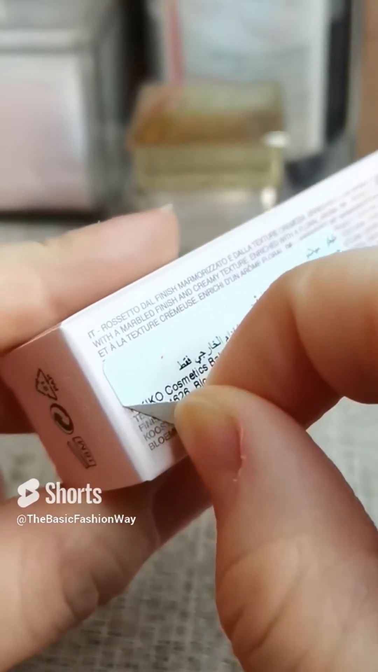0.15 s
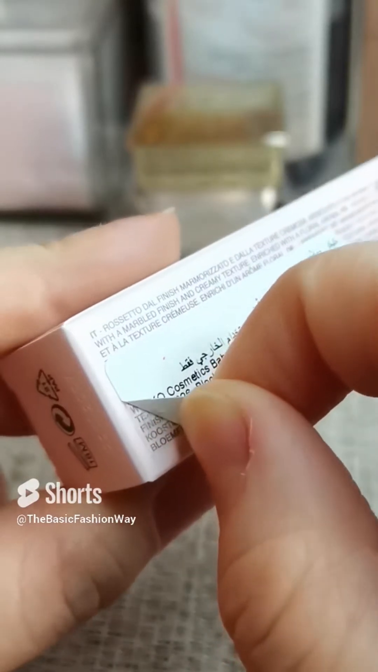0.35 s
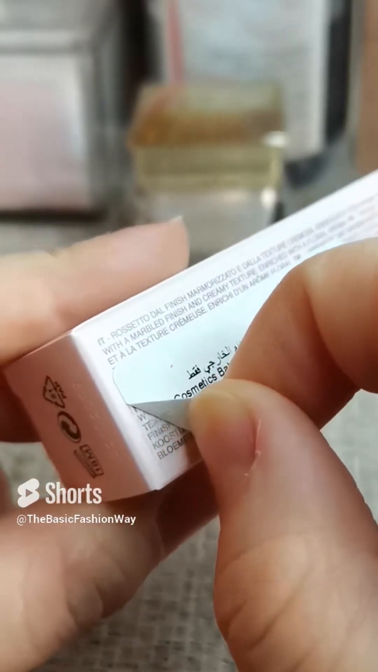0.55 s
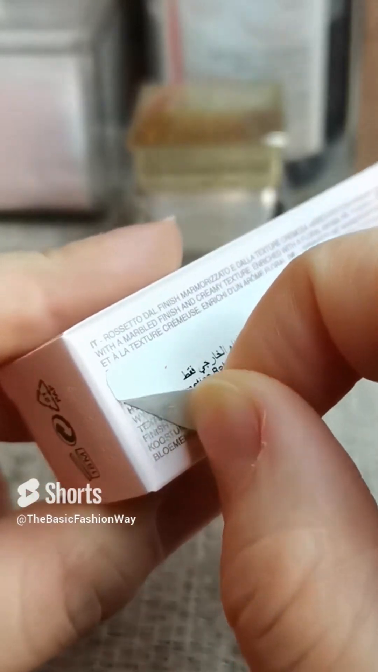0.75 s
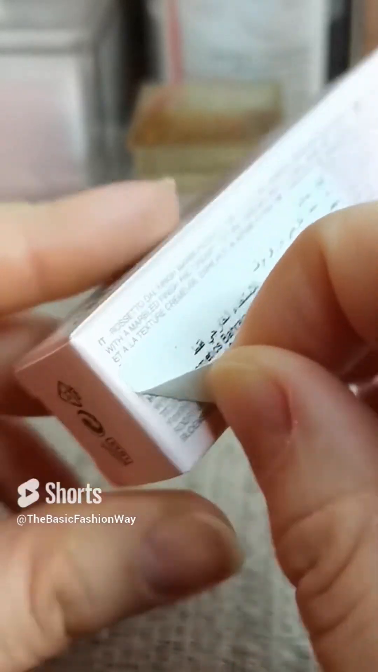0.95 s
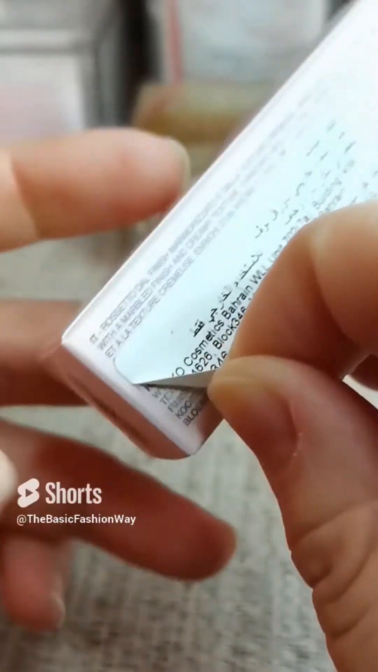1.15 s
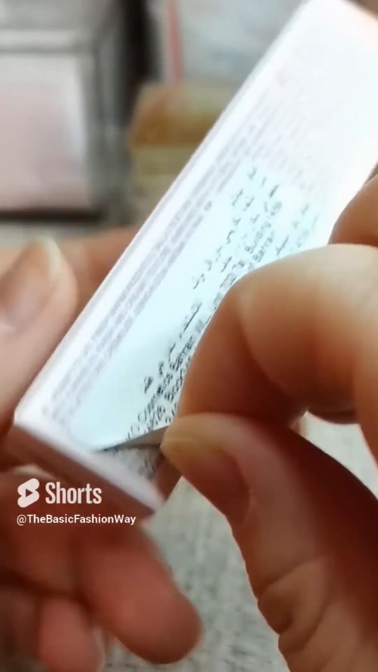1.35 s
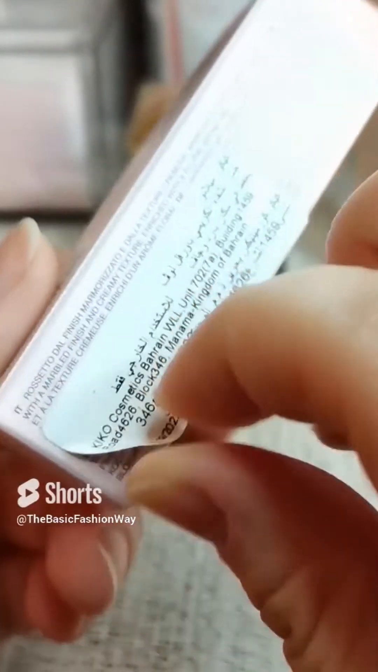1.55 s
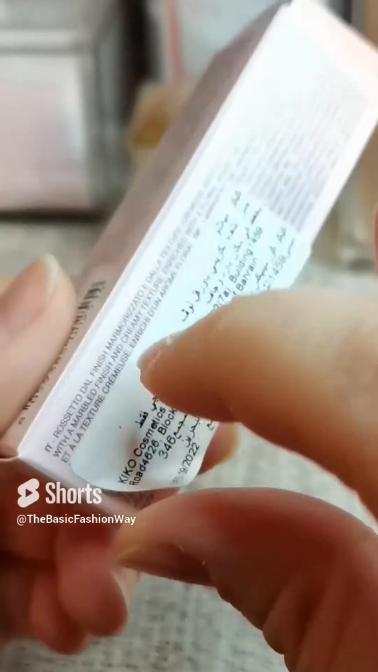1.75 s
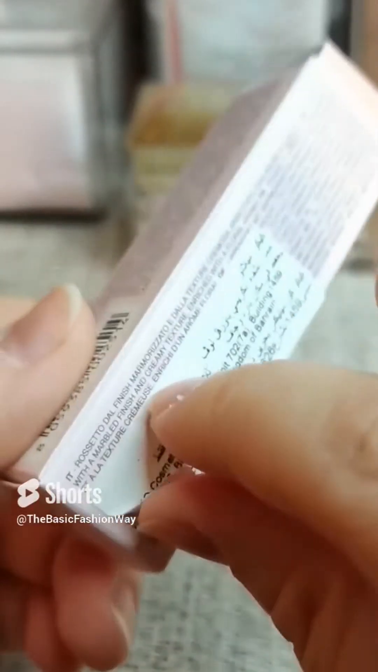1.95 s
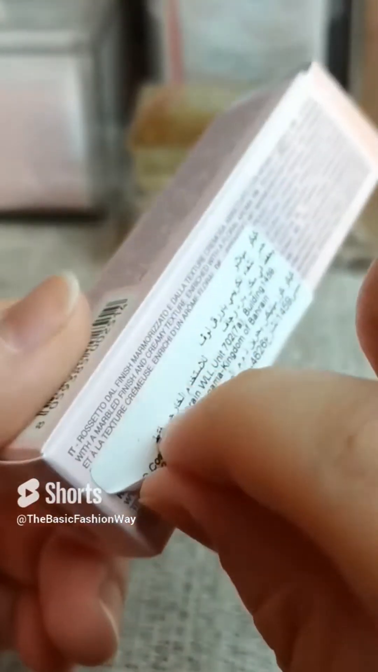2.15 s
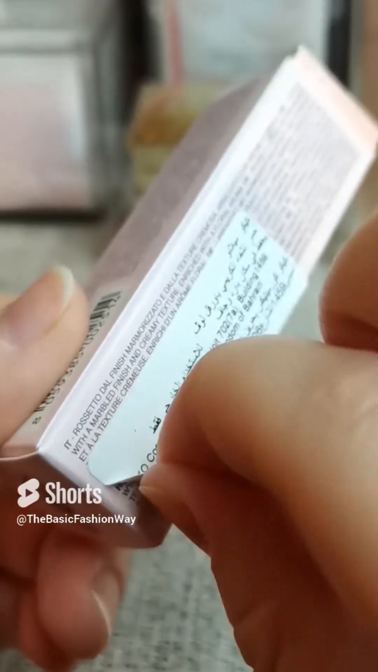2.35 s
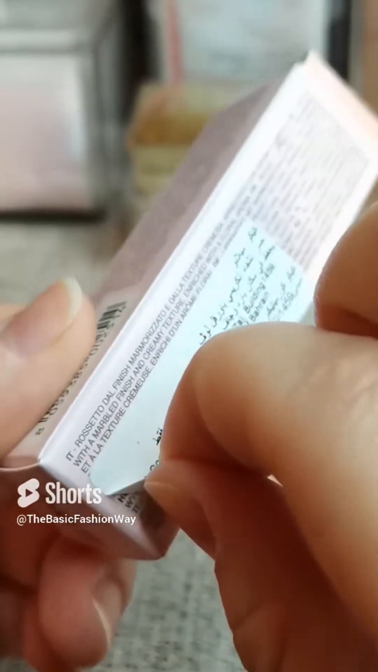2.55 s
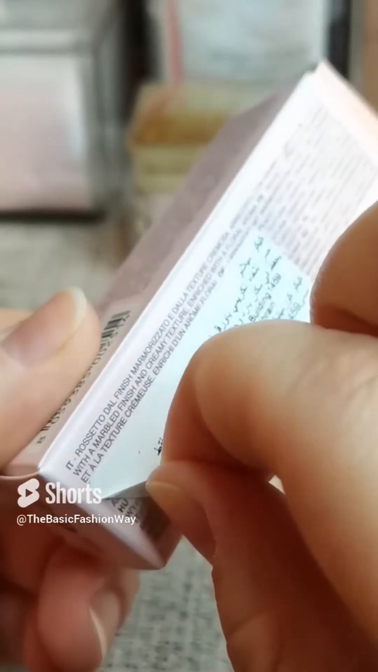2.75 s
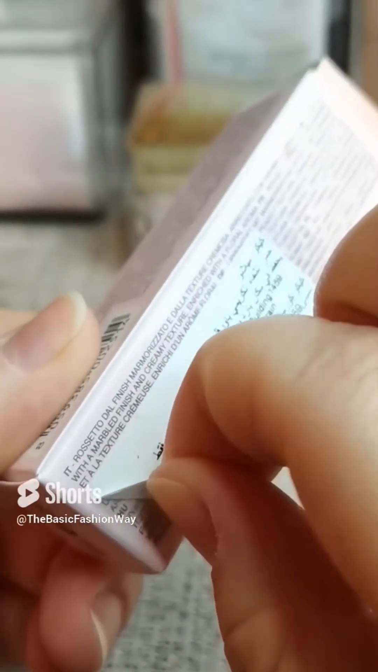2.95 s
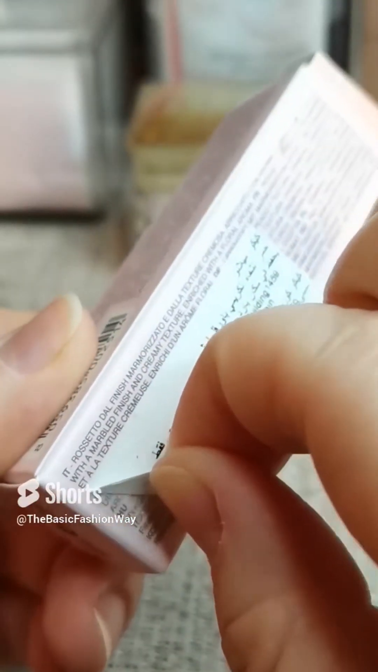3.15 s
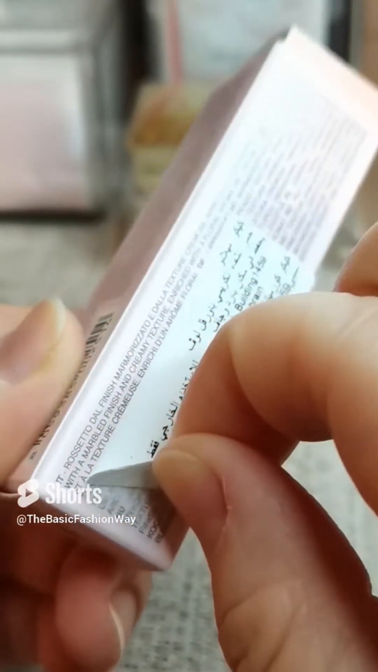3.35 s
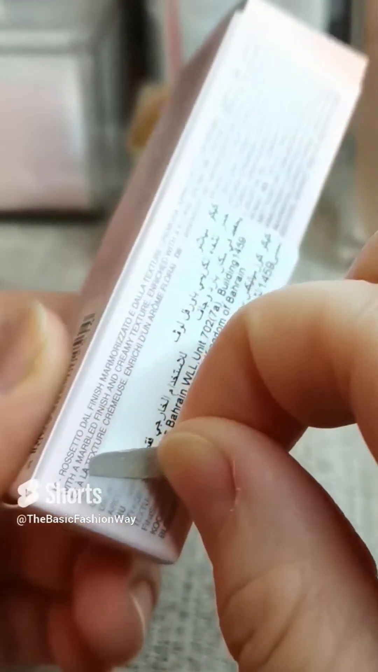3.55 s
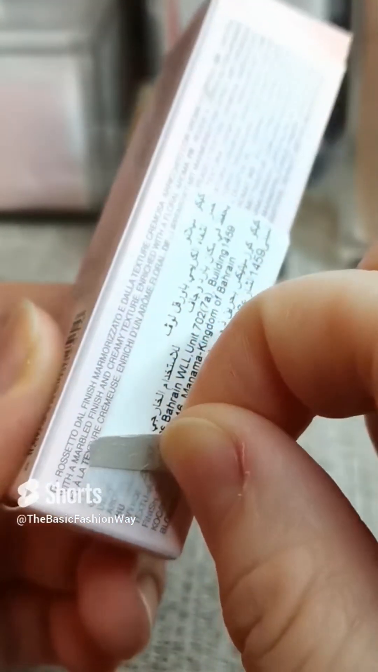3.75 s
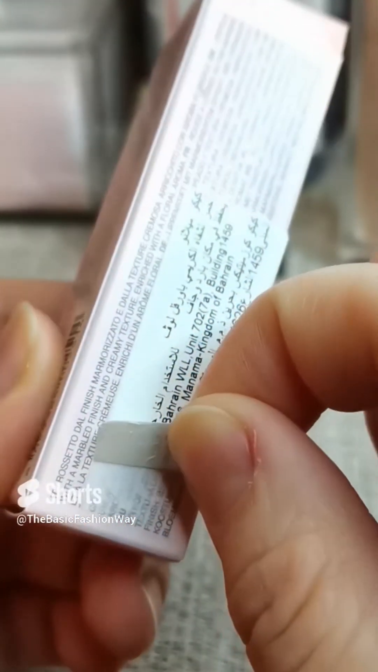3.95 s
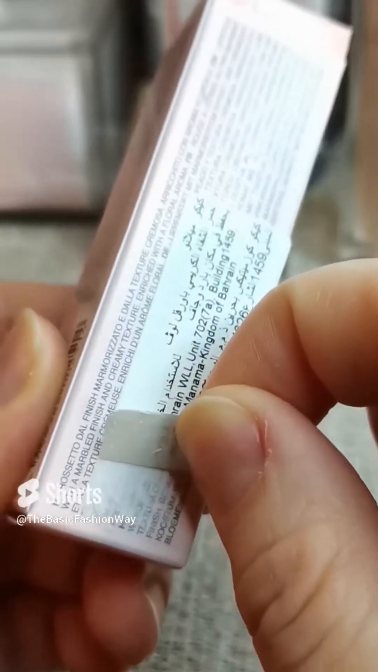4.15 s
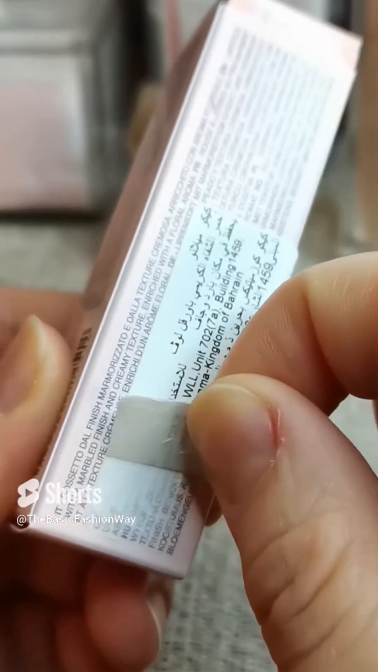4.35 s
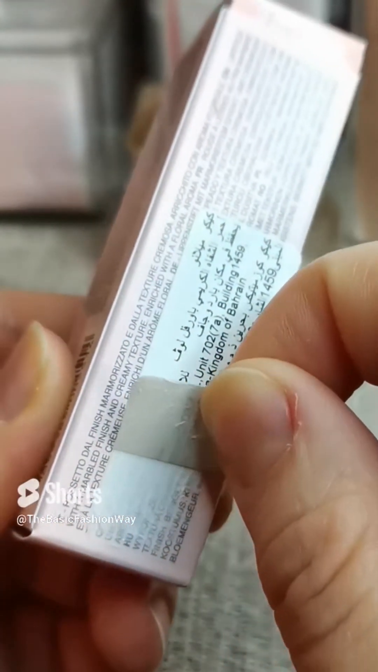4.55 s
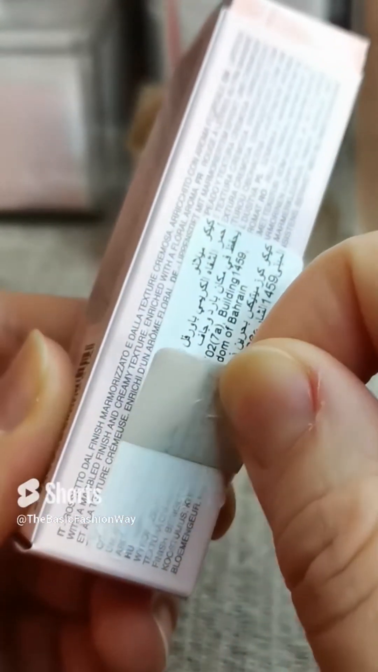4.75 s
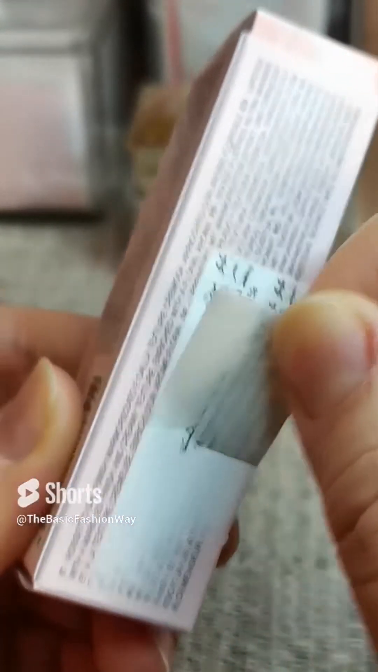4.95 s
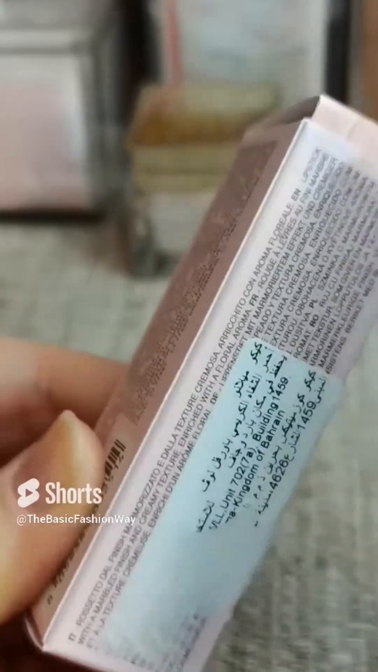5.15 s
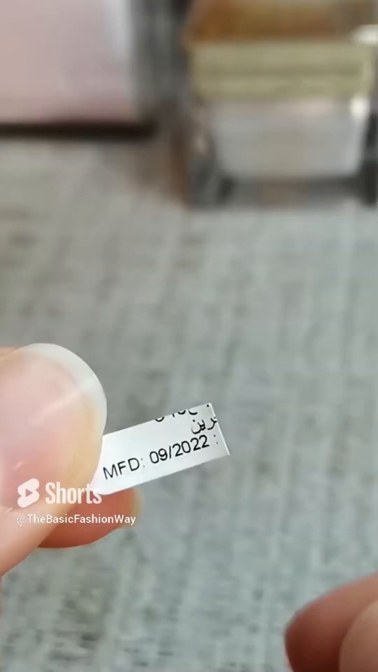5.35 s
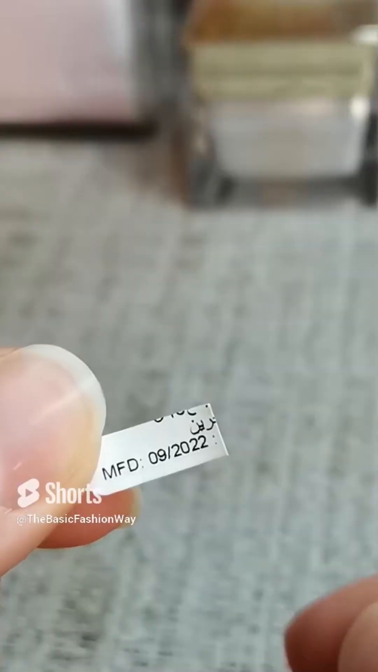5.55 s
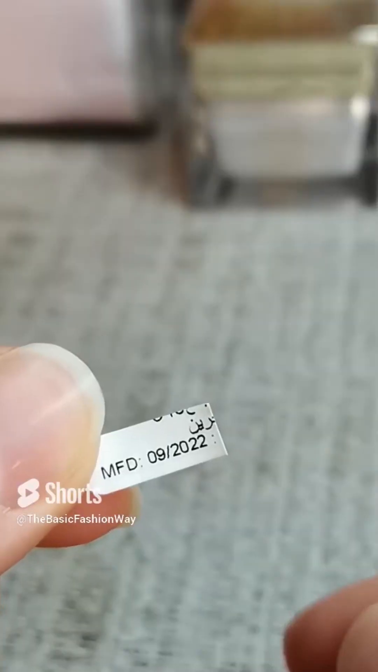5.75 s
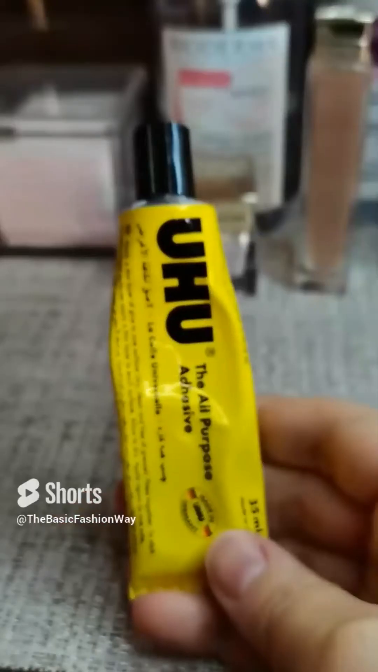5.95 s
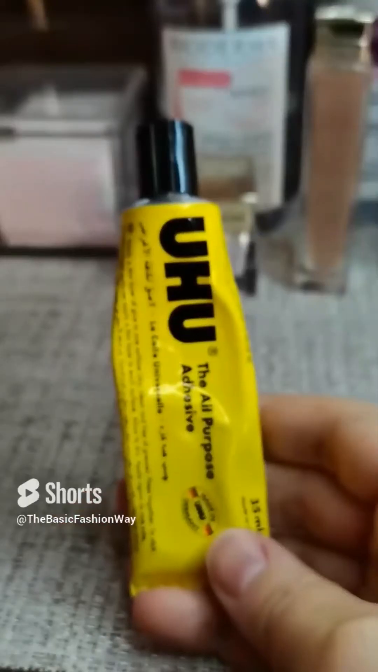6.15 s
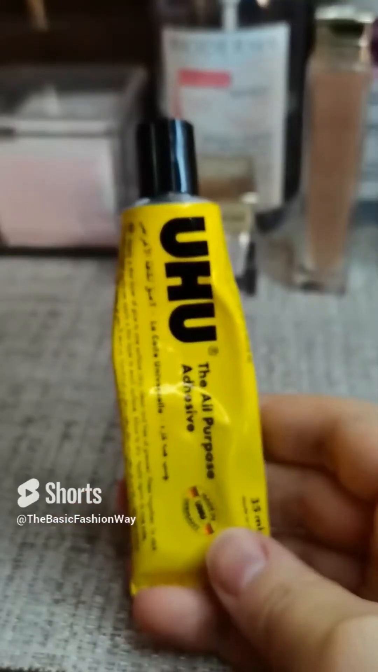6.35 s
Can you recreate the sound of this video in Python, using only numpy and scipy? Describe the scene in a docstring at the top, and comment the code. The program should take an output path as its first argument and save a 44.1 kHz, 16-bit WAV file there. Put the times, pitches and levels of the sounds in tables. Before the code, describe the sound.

Close, quiet picking at a sticker on a little carton: dry scratches, two snaps, sticky crackles, a quick loud tear, then faint room hum.

```python
"""A quiet room, close to a phone: a fingernail picks at a paper label on a small cardboard box and peels it off.
Short scratches lift the corner; in a row of tugs the glue lets go in tiny stick-slip impulses that fizz, rustle
the paper and ring the modes of the hollow box, ending in one fast rip. Glue threads tick, larger patches knock
the box, the taut corner sings thinly through a narrow resonance, and the nail snaps off the edge twice.
Under it lie a faint mains hum of two wavering sines and shaped noise for rumble and hiss."""
import sys
import numpy as np
from scipy import signal
from scipy.fft import rfft, irfft
from scipy.io import wavfile
from scipy.ndimage import uniform_filter1d

SR = 44100
rng = np.random.default_rng(int(sys.argv[2]) if len(sys.argv) > 2 else 0)


def file_out(sig):
    """Save sig as 16-bit WAV at sys.argv[1]."""
    # one column per channel
    cols = np.atleast_2d(sig).T
    # limit, then scale
    lim = np.clip(cols, -1, 1)
    pcm = np.round(lim * 32767).astype(np.int16)
    wavfile.write(sys.argv[1], SR, pcm)


N = 281827
TIME = np.arange(N) / SR
LEAD_IN = 44  # samples before a response's main arrival
TUG_ATTACK_S, TUG_RELEASE_S = 0.01, 0.022

# rustle spectrum of the peeling label: freq_hz, relative_db
PAPER_SPECTRUM = [(500, -34), (1300, -11.5), (1750, -8.5), (1960, 0.5), (2230, -5.5), (2480, -3.5),
                  (2740, -1), (3000, -14), (3500, -10), (4000, -15.5), (4550, -21), (5100, -28.5),
                  (12000, -49)]
# fizz spectrum of parting glue: freq_hz, relative_db
FIZZ_SPECTRUM = [(1000, -9.5), (3000, -7.5), (4500, -0.5), (5200, -7.5), (6500, -3.5), (7600, 5),
                 (8400, -6), (9300, -3.5), (11000, -10.5), (16000, -14.5)]
# modes of the hollow box: freq_hz, width_hz, relative_db
CAVITY_MODES = [(557, 173, -10), (629, 148, 2.5), (770, 210, 0.5), (965, 78.4, 0), (1089, 67, 1.5),
                (1214, 61, 0)]
# modes of the wall under the label: freq_hz, width_hz, relative_db
WALL_MODES = [(1487, 73, -2), (1603, 104, -3.5), (1882, 78, -14)]
# the last rip runs away: time_s, speed (0-1)
RIP_SPEED = [(4.68, 0), (4.775, 0.33), (4.85, 0.37), (4.925, 0.45), (4.98, 0.79), (5.012, 0.85),
             (5.06, 0.68)]


def undb(db):
    """Decibels to amplitude gain."""
    return 10 ** (np.asarray(db) / 20)


def unit(x):
    """Scale to rms 1."""
    return x / np.sqrt(np.mean(x ** 2))


def conv(x, response):
    """Convolve with a response, channel by channel, cut to N samples."""
    return signal.fftconvolve(np.atleast_2d(x), np.atleast_2d(response), axes=1)[:, :N]


def interp_time(points):
    """Straight lines through (time_s, value) points."""
    return np.interp(TIME, *np.transpose(points))


def gains(points, hz):
    """Gain of a (freq_hz, db) spectrum, interpolated over log frequency."""
    point_hz, db = np.transpose(points)
    return undb(np.interp(np.log(hz + 1), np.log(point_hz), db))


def colour(points, size=2048):
    """Minimum-phase response of unit energy with the given spectrum, by folding its cepstrum."""
    cepstrum = irfft(np.log(gains(points, np.fft.rfftfreq(size, 1 / SR))))
    cepstrum[1:size // 2] *= 2
    cepstrum[size // 2 + 1:] = 0
    response = irfft(np.exp(rfft(cepstrum)))
    return response / np.linalg.norm(response)


def ring(modes, size=2048):
    """Unit-energy sum of decaying modes, band-limited; neighbours swing in opposite directions."""
    t = np.arange(size) / SR
    response = np.zeros(size)
    for k, (hz, width_hz, db) in enumerate(modes):
        decay = np.exp(-np.pi * width_hz * t)
        response += (-1) ** k * undb(db) * width_hz * decay * np.cos(2 * np.pi * hz * t)
    band = signal.butter(4, [470, 2800], "band", fs=SR, output="sos")
    response = signal.sosfilt(band, response)
    return response / np.linalg.norm(response)


def tail(t60_s, size=2048):
    """Exponentially fading noise of unit energy, different in each channel."""
    fade = undb(-60 * np.arange(size) / SR / t60_s)
    noise = rng.standard_normal((2, size)) * fade
    return noise / np.linalg.norm(noise, axis=1, keepdims=True)


def ports(response, pan_db, scatter_db, t60_s, size=4096):
    """A response at two microphone ports: direct sound, later on the right, plus scatter from card and fingers."""
    # radiation of the box to the ports: freq_hz, left_lead_rad, left_minus_right_db
    port_pair = [(60, 1, -5.5), (500, 0.54, 5), (760, 0.58, -4.5), (1140, 0.87, -6), (1300, 2.24, 1.5),
                 (1980, 2.3, 1), (2130, 2.8, -0.5), (2430, 6.34, -0.5), (2836, 9.5, -11), (3130, 9.1, 4.5),
                 (3450, 7.2, -0.5), (4540, 13.4, 0), (6800, 13.3, -4.5), (15270, 31.5, -3.5)]
    hz = np.fft.rfftfreq(size, 1 / SR)
    point_hz, lead_rad, balance_db = np.transpose(port_pair)
    lead = np.interp(hz, point_hz, lead_rad)
    balance = np.interp(hz, point_hz, balance_db) + pan_db
    direct = np.exp(-1j * np.outer([0, 1], lead))
    scatter = undb(scatter_db) * hz ** 2 / (hz ** 2 + 3500 ** 2)  # only short waves scatter
    paths = (direct + scatter * rfft(tail(t60_s), size)) / np.hypot(1, scatter)
    sides = undb(np.outer([0.5, -0.5], balance))
    sides = sides / np.sqrt(np.mean(sides ** 2, axis=0))
    pair = irfft(rfft(response, size) * paths * sides)
    return np.roll(pair, LEAD_IN, axis=1)[:, :size // 2]


def walk(rate_hz):
    """Slow random curve of rms near 1: held random values smoothed twice."""
    k = int(SR / rate_hz)
    held = np.repeat(rng.standard_normal(N // k + 1), k)
    smooth = uniform_filter1d(uniform_filter1d(held, k), k)
    return unit(smooth[:N])


def add(out, time_s, sound, peak_db):
    """Place a sound's main arrival at a time; peak_db sets the mean of the two channel peaks."""
    i = int(time_s * SR) - LEAD_IN
    out[:, i:i + sound.shape[1]] += sound * undb(peak_db) / np.abs(sound).max(axis=1).mean()


def steady(x, window_s):
    """Even out the power over a window: the hand pulls steadily, however the slips fall."""
    k = int(window_s * SR)
    power = np.mean(x ** 2, axis=0)
    return x / np.sqrt(uniform_filter1d(uniform_filter1d(power, k), k) + 1e-9)


def slips(rate_hz, spread_db):
    """Stick-slip impulses at random moments with random sign and uneven sizes."""
    hits = rng.random(N) < rate_hz / SR
    sizes = undb(spread_db * np.minimum(rng.exponential(size=N), 4))
    return hits * sizes * rng.choice([-1, 1], N)


def shifting(x, response, pan_db, scatter_db, t60_s):
    """Slips through a response, evened to rms near 1; the scatter changes as the fingers shift their grip."""
    grip_rad = 1.2 * walk(5)
    a = conv(x, ports(response, pan_db, scatter_db, t60_s))
    b = conv(x, ports(response, pan_db, scatter_db, t60_s))
    return steady(np.cos(grip_rad) * a + np.sin(grip_rad) * b, 0.022)


def stroke(start_s, end_s, attack_s, release_s):
    """Gain that rises until the start, holds, and dies away after the end."""
    rise = np.maximum((start_s - TIME) / attack_s, 0) ** 2
    fall = np.maximum((TIME - end_s) / release_s, 0)
    return np.exp(-rise - fall)


def strokes(rows, attack_s, sag_db_per_s, release_s):
    """Box and fizz gains of a row of hand strokes: each grips, sags as the tension eases, and dies away."""
    power = 0
    for start_s, length_s, box_db, fizz_db in rows:
        sag = undb(-sag_db_per_s * np.maximum(TIME - start_s, 0))
        shape = stroke(start_s, start_s + length_s, attack_s, release_s) * sag
        power = power + np.outer(undb([box_db, fizz_db]), shape) ** 2
    return np.sqrt(power)


def rasp(effort, label, rate_hz, cavity_db, wall_db, paper_db, fizz_db, coupling, pan_db):
    """Slips of glue or nail ring the box, rustle the label and fizz; effort holds box and fizz gains."""
    # sizzle spectrum of fast tearing: freq_hz, relative_db
    sizzle_spectrum = [(4000, -18.5), (8000, -6.5), (10000, -4), (16000, -7)]
    flex_spectrum = [(100, -27.0), (290, 0.5), (420, -3.0), (900, -31.0)]
    box_level_db, fizz_level_db = 20 * np.log10(effort + 1e-6)
    speed = interp_time(RIP_SPEED)

    main_slips = slips(rate_hz * (1 + 4 * speed), 3.8)
    threads = slips(3000, 3.5)
    push = main_slips + undb(-14) * threads
    crackle = main_slips + undb(-5) * threads

    # a fast rip shakes the whole box and turns the label's rustle into a sizzle
    cavity = shifting(push, ring(CAVITY_MODES), pan_db, -10, 0.012)
    cavity *= undb(box_level_db + cavity_db + 7 * speed)
    wall = shifting(push, ring(WALL_MODES), pan_db, -6.5, 0.015)
    wall *= undb(box_level_db + wall_db + 4 * speed)
    # the card also bends as a whole, a faint thud below its modes
    flex = shifting(push, colour(flex_spectrum), 0, -7, 0.012) * undb(box_level_db - 33.5)
    # the label couples glue to box: coupling 1 follows the box level, 0 the fizz level
    paper_level_db = coupling * box_level_db + (1 - coupling) * fizz_level_db + paper_db - 9 * speed
    paper = shifting(push, colour(label), pan_db, 7.5, 0.036) * undb(paper_level_db)
    fizz = shifting(crackle, colour(FIZZ_SPECTRUM), 2, 5.8, 0.021)
    fizz *= undb(fizz_level_db + fizz_db - 2 * speed)
    sizzle = shifting(crackle, colour(sizzle_spectrum), -1.1, 4.7, 0.027)
    sizzle *= undb(fizz_level_db - 13 + 13.4 * speed)
    return cavity + wall + flex + paper + fizz + sizzle


def background():
    """Wavering mains hum (phase and level wander) over low room rumble and faint hiss (shaped noise)."""
    # room noise spectrum: freq_hz, relative_db
    room_tone = [(20, -8.5), (50, -2.5), (125, 2), (180, -4.5), (300, -8), (500, -16), (1000, -19.5),
                 (2000, -26.5), (4200, -30.5), (5000, -37.5), (8000, -41), (11500, -32), (16000, -33.5)]
    # mains hum partials before swell and waver: freq_hz, base_rms_db
    hum_partials = [(100, -63), (200, -70.5)]
    # slow swell of the hum: time_s, gain_db
    hum_swell = [(0, 1), (1.2, 2.5), (2.3, 1), (2.85, 3), (3.1, -0.5), (4.5, -1.5), (6.4, -2.5)]
    side_spectrum = [(30, -0.5), (100, -4), (500, -1.5), (2000, 0.5), (8000, 0)]

    hz = np.fft.rfftfreq(N, 1 / SR)
    mid, side = rfft(rng.standard_normal((2, N))) * gains(room_tone, hz)
    side = side * gains(side_spectrum, hz)
    air = undb(-61) * unit(irfft(np.array([mid + side, mid - side]), N))

    swell_db = interp_time(hum_swell)
    hum = np.zeros(N)
    for partial_hz, base_db in hum_partials:
        level_db = base_db + swell_db + 2.67 * walk(27)
        phase_rad = 2 * np.pi * partial_hz * TIME + partial_hz / 300 * walk(9)
        hum += undb(level_db) * unit(np.sin(phase_rad))
    return air * undb([[1.2], [-1.2]]) + hum * undb([[2.2], [-2.2]])


def creep():
    """Tiny glue threads keep one narrow resonance of the taut corner going while the glue creeps."""
    corner_spectrum = [(5000, -37), (6400, -12), (7100, 5), (7800, 3), (8500, -14), (12000, -26.5)]
    held = stroke(start_s=2.584, end_s=2.9, attack_s=0.09, release_s=0.2)
    song = shifting(slips(2900, 5.4), colour(corner_spectrum), -0.91, -4, 0.0066)
    return song * undb(-71) * held


def ticks():
    """A glue thread parts with a bright tick that flutters through the label."""
    # single glue threads breaking: time_s, peak_db, pan_offset_db (left minus right), centre_hz
    thread_breaks = [(0.2064, -51.5, 6, 8960), (0.338, -54.5, -7, 9030), (0.4427, -45, -3, 8700),
                     (0.588, -39.5, -1, 7460), (1.516, -45.5, 0, 6250), (1.528, -48.5, 6, 6460),
                     (2.657, -29, 2, 7630), (2.72, -35, -1, 7000), (2.8326, -43, -15, 6540),
                     (2.838, -34.5, 5, 6900), (2.9464, -50, 0, 6760), (3.0929, -50.5, -3, 7000),
                     (3.2286, -45.5, -3, 7350), (3.981, -46, 3, 6270), (4.0876, -40.5, -7, 9330),
                     (4.115, -35.5, -2, 7260)]
    out = np.zeros((2, N))
    for time_s, peak_db, pan_db, hz in thread_breaks:
        upper = [(hz, 2), (hz * 1.25, -6), (hz * 1.6, -1), (hz * 2.2, -7)]
        tick = colour([(500, -27), (hz / 3, -24), (hz * 0.7, -16)] + upper)
        add(out, time_s, ports(tick, pan_db, 11, 0.024), peak_db)
    return out


def knocks():
    """A larger patch lets go at once and the box wall springs back, ringing its modes."""
    # jerks of the label that knock the box: time_s, peak_db
    label_jerks = [(0.247, -63), (0.904, -38), (1.214, -47), (1.267, -52), (1.338, -43.5), (1.388, -37.5),
                   (4.115, -40), (4.248, -45), (4.379, -38), (4.399, -36), (4.428, -33.5), (4.435, -33),
                   (4.464, -31.5), (4.608, -34), (4.644, -30.5), (4.739, -44), (4.837, -26), (4.931, -22)]
    box = undb(-7) * ring(CAVITY_MODES) + undb(3) * ring(WALL_MODES)
    label = undb(-2) * colour(PAPER_SPECTRUM) + undb(-12) * colour(FIZZ_SPECTRUM)
    out = np.zeros((2, N))
    for time_s, peak_db in label_jerks:
        add(out, time_s, ports(box + label, 0, 3, 0.0063), peak_db)
    return out


def snaps():
    """The nail slips off the edge: a crack, the ring of the wall it hits, and the boom of the whole box."""
    # nail snaps: time_s, peak_db, pan_offset_db (left minus right), ring_hz, upper_ring_hz, ring_db, boom_db
    nail_snaps = [(0.929, -18.5, 3, 1266, 2210, 1, -9), (1.5775, -21.5, 4, 1470, 1780, -0.5, -36)]
    # crack spectrum: freq_hz, relative_db
    crack_spectrum = [(300, -28), (600, -21), (1000, -10), (1600, -13), (2200, -17), (2700, -3),
                      (3000, -0.5), (3400, -7), (3750, -6), (4180, 0), (5100, -17.5), (6600, -7),
                      (9000, -14.5), (16000, -25.5)]
    out = np.zeros((2, N))
    for time_s, peak_db, pan_db, ring_hz, upper_hz, ring_db, boom_db in nail_snaps:
        wall = undb(ring_db) * ring([(ring_hz, 100, 0), (upper_hz, 130, -3)])
        boom = undb(boom_db) * ring(CAVITY_MODES[:3])
        snap = colour(crack_spectrum) + wall + boom
        add(out, time_s, ports(snap, pan_db, 13.2, 0.02), peak_db)
    return out


def picking():
    """Nail strokes at the corner: slips of the nail scratch the label and ring the box."""
    # nail strokes: start_s, length_s, box_drive_db, fizz_drive_db
    nail_strokes = [(0.19, 0.45, -77, -70), (0.592, 0.041, -67.5, -53.5), (0.897, 0.012, -55, -58),
                    (0.938, 0.034, -57, -69), (0.999, 0.059, -52, -66), (1.065, 0.037, -56, -56.5),
                    (1.217, 0.0087, -57.5, -63.5), (1.276, 0.019, -60, -63), (1.343, 0.02, -56, -81),
                    (1.398, 0.0093, -56.5, -54), (1.45, 0.053, -66.5, -78), (1.555, 0.01, -71, -57),
                    (1.59, 0.042, -61.5, -81), (1.912, 0.014, -63, -65.5), (2.16, 0.0099, -65.5, -71.5)]
    # scratch spectrum of the label: freq_hz, relative_db
    scratch_spectrum = [(500, -20.5), (1000, -12.5), (1250, 4), (1500, -4.5), (1900, 8.5), (2250, -10.5),
                        (2750, -2.5), (3050, -7.5), (3500, -7), (4300, -11), (5100, -25), (12000, -34.5)]
    effort = strokes(nail_strokes, attack_s=0.014, sag_db_per_s=26, release_s=0.023)
    return rasp(effort, scratch_spectrum, rate_hz=270, cavity_db=-8.5, wall_db=-6, paper_db=-1,
                fizz_db=-4, coupling=1.0, pan_db=1.5)


def tugs():
    """Box and fizz gains of the tugs at the label."""
    # tugs: start_s, length_s, box_drive_db, fizz_drive_db
    label_tugs = [(2.665, 0.24, -81, -62.5), (3.25, 0.11, -86, -58), (3.428, 0.087, -75, -58.5),
                  (3.544, 0.028, -72, -56), (3.643, 0.012, -69, -58), (3.879, 0.005, -76, -63.5),
                  (3.923, 0.03, -62.5, -57), (3.977, 0.012, -60.5, -56.5), (4.1, 0.045, -59, -56),
                  (4.246, 0.051, -55.5, -51), (4.384, 0.044, -48.5, -58.5), (4.43, 0.049, -48, -57.5),
                  (4.51, 0.027, -56, -68.5), (4.607, 0.067, -47, -63)]
    return strokes(label_tugs, TUG_ATTACK_S, 30, TUG_RELEASE_S)


def pull():
    """Box and fizz gains of slow slipping between tugs; the box rings more as the peel nears mid-wall."""
    start_s, end_s, rise_db_per_s = 2.9, 4.74, 22
    end_box_db, fizz_db = -58.5, -74
    held = stroke(start_s, end_s, TUG_ATTACK_S, TUG_RELEASE_S)
    box = held * undb(end_box_db + rise_db_per_s * (TIME - end_s))
    return np.array([box, held * undb(fizz_db)])


def rip():
    """Box and fizz gains of the last rip: both follow its speed; the box falls back once the label goes slack."""
    # the label stops pulling on the box just before its last edge comes free
    start_s, slack_s, end_s = 4.745, 5.02, 5.09
    attack_s, release_s, slack_db = 0.01, 0.007, -22
    box_db, fizz_db, range_db = -17, -33, 29.5  # drives at speed 1, and their drop at speed 0
    drive = undb(range_db * (interp_time(RIP_SPEED) - 1))
    taut = stroke(start_s, slack_s, attack_s, release_s)
    tearing = stroke(start_s, end_s, attack_s, release_s)
    box = undb(box_db) * np.maximum(taut, undb(slack_db) * tearing)
    return drive * np.array([box, undb(fizz_db) * tearing])


def peeling():
    """Tugs, the pull between them and the last rip: slipping glue rustles the label and rings the box."""
    effort = np.hypot(tugs(), pull()) + rip()
    return rasp(effort, PAPER_SPECTRUM, rate_hz=300, cavity_db=-11, wall_db=-2, paper_db=-1.5,
                fizz_db=-1.5, coupling=0.84, pan_db=1.5)


def scene():
    """The handling sounds, their short echo in the room, and the background."""
    near = creep() + ticks() + knocks() + snaps() + picking() + peeling()
    room = conv(near, tail(0.21, size=16384))
    return background() + undb(-14.5) * room + near


def record(dry):
    """The phone cuts the top: a steep elliptic low-pass at 16.2 kHz."""
    low_pass = signal.ellip(10, 0.2, 70, 16200, fs=SR, output="sos")
    return signal.sosfilt(low_pass, dry)


dry = scene()
out = record(dry)
file_out(out)
```